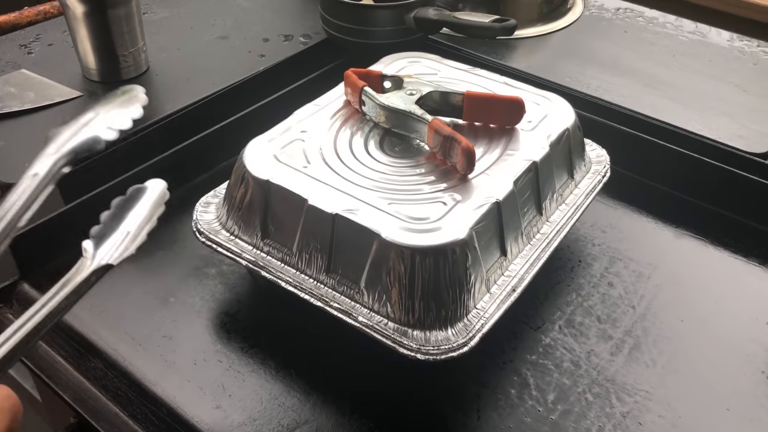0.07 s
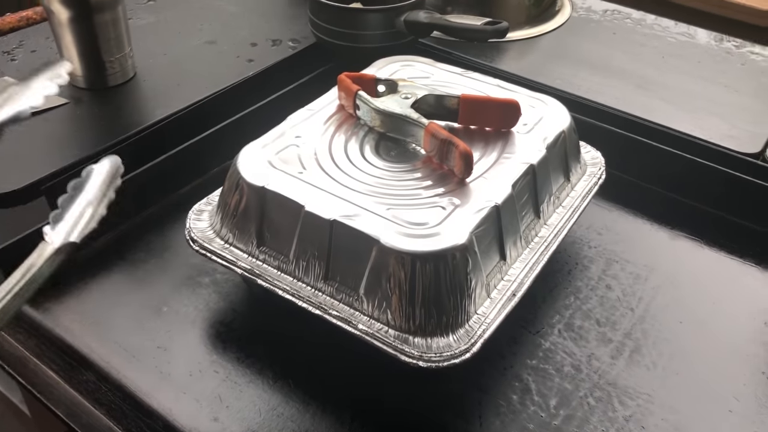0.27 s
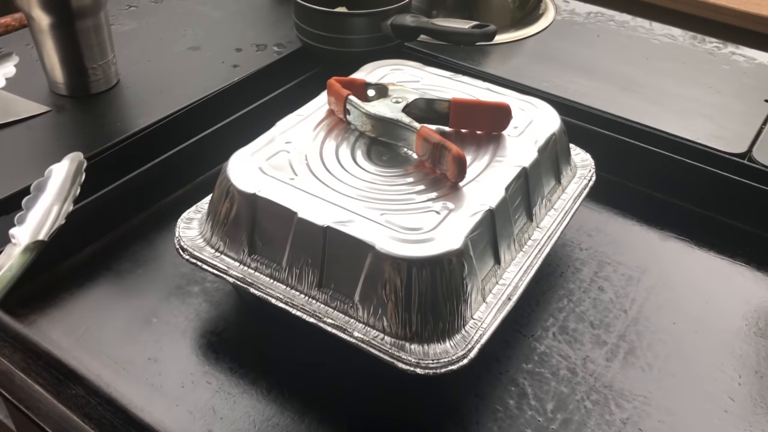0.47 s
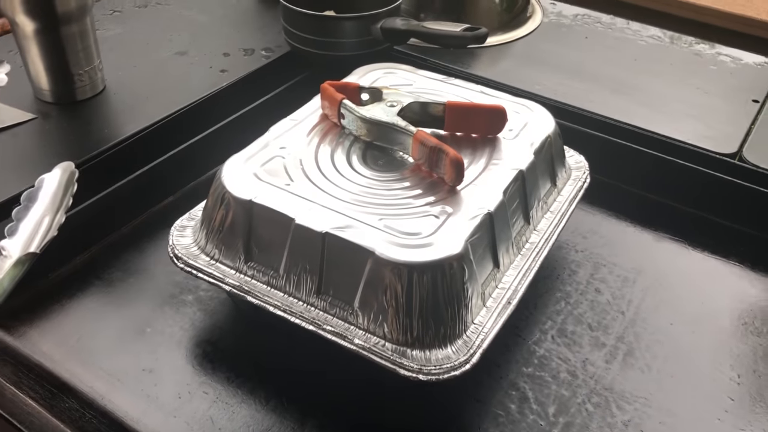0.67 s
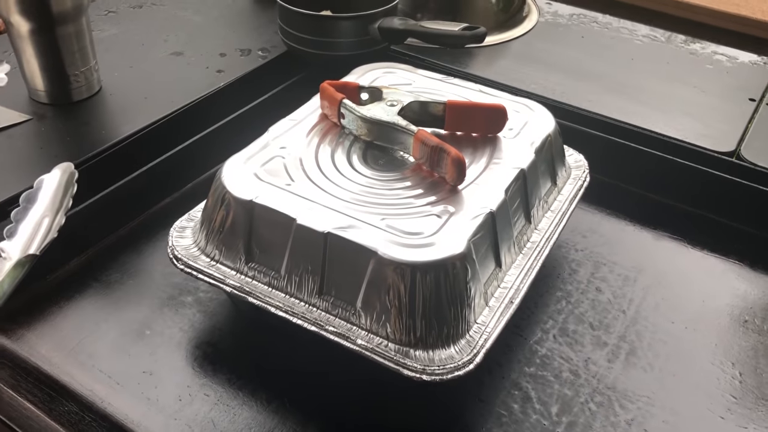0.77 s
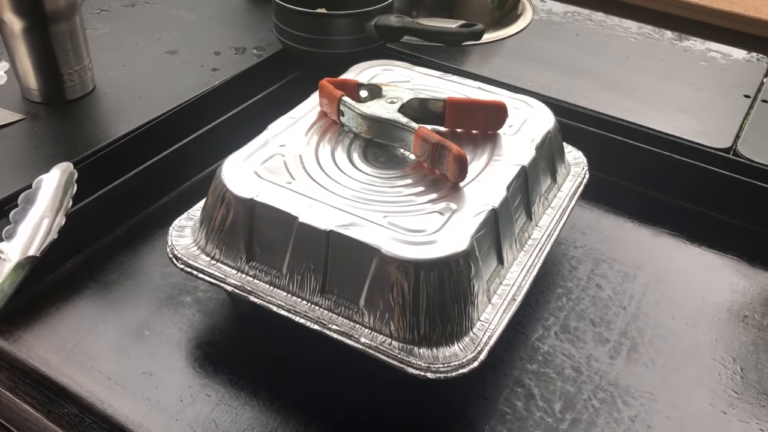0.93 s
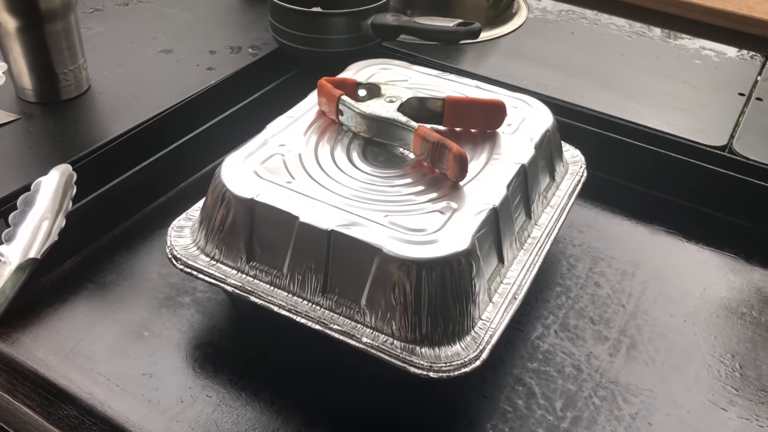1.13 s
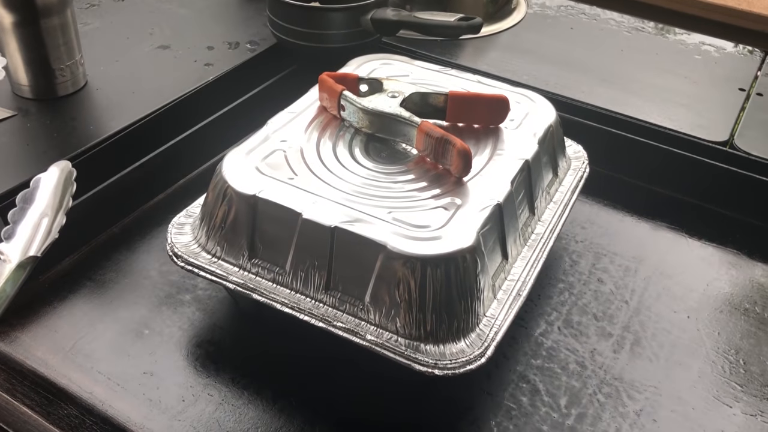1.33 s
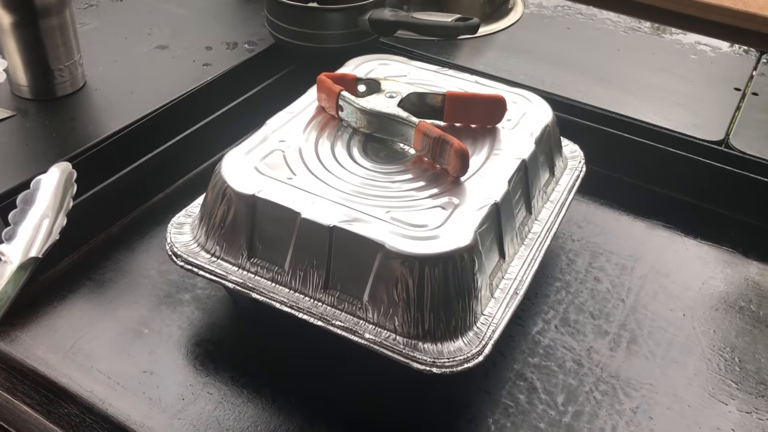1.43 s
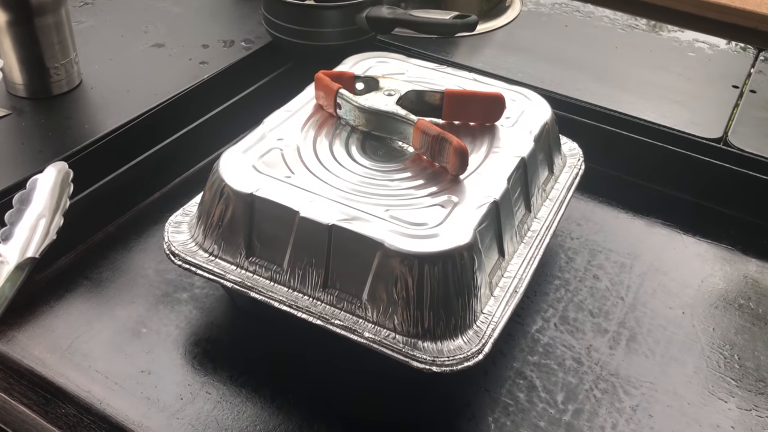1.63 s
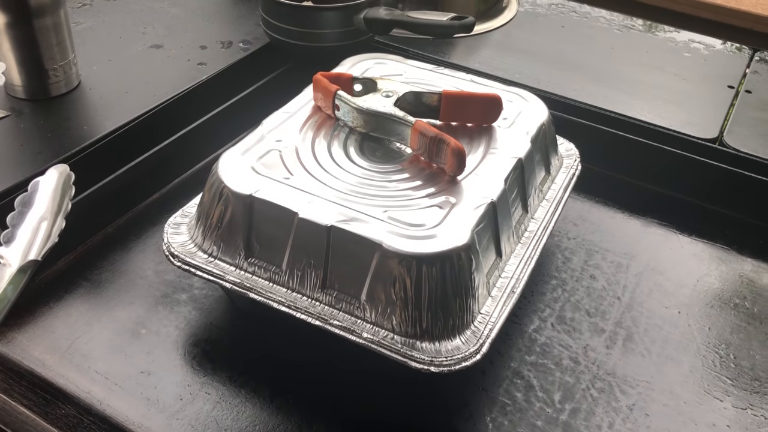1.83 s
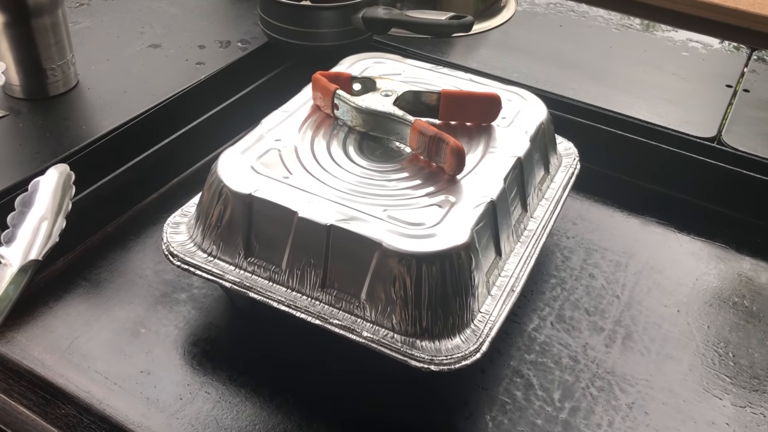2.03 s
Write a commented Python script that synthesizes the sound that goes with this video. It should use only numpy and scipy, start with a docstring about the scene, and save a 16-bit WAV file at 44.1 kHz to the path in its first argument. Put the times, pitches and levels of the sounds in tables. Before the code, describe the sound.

Close up on an outdoor griddle, two quick popcorn pops, the second very loud and rattling the thin foil cover, then a quiet gap and another softer pop with faint ticks, over low hum and sizzle.

```python
"""Popcorn kernels burst in oil on an outdoor griddle, under an upturned foil tray, close to the microphone.
Each of three bursts is a puff (a pressure swing) and a sharp crack (a crowd of fine modes, with rings). Two
kernels fly against the foil, and the tray once drops back onto the griddle; the foil rings like a slack drum
(struck modes and a rattle); pieces tick down. Behind them the oil sizzles faintly (coloured noise and tiny
spits) over the burner's rumble and hum (noise)."""
import sys
import numpy as np
from scipy import signal
from scipy.fft import rfft, irfft
from scipy.io import wavfile

SR = 44100
rng = np.random.default_rng(int(sys.argv[2]) if len(sys.argv) > 2 else 0)


def to_wav(s):
    """Save 16-bit WAV."""
    ch = np.atleast_2d(s).T  # columns
    pcm = np.round(np.clip(ch, -1, 1) * 32767)  # PCM
    wavfile.write(sys.argv[1], SR, pcm.astype(np.int16))


N = 92610
TIME = np.arange(N) / SR   # s
HZ = np.maximum(np.arange(N // 2 + 1) * SR / N, 1)   # the spectrum's bins, kept above zero for logarithms

# Kernels bursting under the tray. Each row: start in seconds, crack level in dB, treble tilt in dB per octave,
# top octaves in dB, hollow ring in dB, hull pitch in Hz, hull ring in dB, puff depth in dB,
# puff width (standard deviation) in seconds, puff lag in seconds.
BURSTS = [(0.2162, -20.5, 1.5, -4, -17, 2538, -21, -14.5, 0.00037, 0.0009),
          (0.3246, -8.5, 0.5, -0.5, -4, 4330, -12.5, -5.5, 0.00054, 0.0036),
          (1.4373, -20, -1.64, -7, -22, 3885, -28, -9.5, 0.00035, -.0002)]
# Colour of the crack. Each row: frequency in Hz, density in dB per Hz.
CRACK_COLOUR = [(100, -10), (420, 2), (750, -6), (1250, -9.5), (1700, 0.5), (2150, -11.5), (2700, -7),
                (4000, 0), (5000, -6.5), (8000, -2), (11000, -7), (15500, -21.5)]
# Resonances of the space under the tray. Each row: frequency in Hz, level in dB, t60 in seconds.
HOLLOW_MODES = [(288, -23, .06), (437, -13.5, 0.071), (541, -22.5, 0.11), (911, -11.5, 0.035),
                (1050, -16.5, 0.041), (1608, -14.5, 0.035), (1738, -19, 0.073), (1968, -30, 0.12),
                (2616, -5, 0.027), (2864, -19.5, .06), (3566, -27, 0.17), (4340, -24.5, .07),
                (6140, -15, 0.039), (6900, -12.5, 0.033), (7920, -34, 0.049)]
# How the crack dies away. Each row: frequency in Hz, t60 in seconds.
CRACK_DECAY = [(150, 0.022), (500, 0.23), (2000, 0.13), (5000, 0.061), (9000, 0.1), (15000, 0.081)]
SNAP_DB, SNAP_T60_S, CRACK_ATTACK_S = 0, 0.019, 0.00083   # the first instant stands above the tail
TOP_HZ = 5100   # where the top octaves begin
HULL_T60_S = 0.035   # each hull rings briefly at its own pitch


def pops():
    """A hull splits: a puff of steam, and a crack that rings and bounces about under the tray."""
    out = 0
    for start, crack_db, tilt_db, top_db, hollow_db, hull_hz, hull_db, puff_db, width, lag in BURSTS:
        top_shelf_db = top_db / (1 + (TOP_HZ / HZ) ** 10)
        fine = crowd(tilted(at_hz(CRACK_COLOUR), tilt_db) + top_shelf_db)
        snap = from_db(SNAP_DB) * fine * fade(start, SNAP_T60_S, CRACK_ATTACK_S)
        tail = dying(fine, start, CRACK_DECAY, CRACK_ATTACK_S) / 2
        hollow = from_db(hollow_db) * modes(start, HOLLOW_MODES)
        hull = from_db(hull_db) * ring(start, hull_hz, HULL_T60_S, 0)
        puff = from_db(puff_db) * swing(start + lag, width)
        out = out + from_db(crack_db) * (snap + tail) + hollow + hull + puff
    return out


# Blows on the foil: two kernels striking it, and between them the tray dropping back onto the griddle. Each
# row: start in seconds, ring level in dB, spot struck (0 or 1), # rattle level in dB, rattle tilt in dB per
# octave.
FOIL_STRIKES = [(.3487, -16, 0, -18.5, 1.5), (0.3703, -26.5, 0, -22, -1.5), (1.5385, -28.5, 1, -28, -0.2)]
# Main modes of the tray. Each row: frequency in Hz, t60 in seconds, level in dB struck at spot 0,
# level in dB struck at spot 1.
TRAY_MODES = [(236, .38, -12, -10), (331, .28, -4, -12), (378, .44, -5, -16), (404, .36, -20, -1),
              (420, .25, -6, -14), (452, .31, 1, -3), (503, .33, -11, -4), (531, .22, -4, -16),
              (579, .34, -15, -5), (618, .26, -3, -15), (662, .32, -12, -13), (741, .33, -12, -11),
              (817, .23, -6, -9), (856, .27, -8, -10), (912, .22, -7, -8), (1094, .24, -20, -4),
              (1145, .28, -15, -6), (1208, .28, -12, -9), (1284, .26, -13, -16), (1378, .2, -17, -2)]
# Colour of the finer foil modes. Each row: frequency in Hz, density in dB per Hz.
RATTLE_COLOUR = [(90, -24), (200, -12), (350, -3), (800, -4), (1050, -6.5), (1350, -7.5), (1850, -8),
                 (2150, -19), (3300, -18.5), (5000, -33), (15000, -47)]
# How the rattle dies away. Each row: frequency in Hz, t60 in seconds.
RATTLE_DECAY = [(200, 0.26), (600, 0.32), (1400, .26), (2500, 0.11), (8000, 0.13)]
DENT_DB, DENT_S = -2, 0.00015   # the foil's first dent, against the rattle level; its width


def foil():
    """A flying kernel, or the tray dropping back onto the griddle, dents the foil and sets its main modes
    ringing, with a rattle of finer ones."""
    out = 0
    for start, ring_db, spot, rattle_db, tilt_db in FOIL_STRIKES:
        struck = [(hz, second_db if spot > .5 else first_db, t60) for hz, t60, first_db, second_db in TRAY_MODES]
        main = modes(start, struck)
        fine = crowd(tilted(at_hz(RATTLE_COLOUR), tilt_db))
        rattle = dying(fine, start, RATTLE_DECAY, STRIKE_ATTACK_S)
        dent = from_db(DENT_DB) * swing(start + DENT_S, DENT_S)
        out = out + from_db(ring_db) * main + from_db(rattle_db) * (rattle + dent)
    return out


# Pieces falling back onto the foil. Each row: start in seconds, level in dB, treble tilt in dB per octave.
FALLING_PIECES = [(0.454, -30, 2), (0.4639, -31.5, 1.5), (0.475, -46, 7.5), (0.5162, -36, 3),
                  (0.62, -54, 6), (1.474, -48.5, 14), (1.509, -51, 10), (1.5415, -43.5, 17),
                  (1.623, -54.5, 10), (1.707, -48.5, 1)]
# Colour of a light touch. Each row: frequency in Hz, density in dB per Hz.
TICK_COLOUR = [(300, 3), (1000, -2.5), (1400, 1), (1800, -3), (2200, -11), (3500, -13), (6000, -25),
               (10000, -27), (15500, -56)]
# How a touch dies away. Each row: frequency in Hz, t60 in seconds.
TICK_DECAY = [(500, .12), (1700, 0.11), (3500, 0.075), (10000, 0.044)]
# Small modes that a light touch rings. Each row: frequency in Hz, level in dB, t60 in seconds.
TICK_MODES = [(1383, -2.5, 0.15), (1663, -0.5, 0.1), (1888, -5.5, 0.17)]


def ticks():
    """Light pieces touch the foil as they fall, ringing fine modes and a few small distinct ones."""
    out = 0
    for start, db, tilt_db in FALLING_PIECES:
        fine = crowd(tilted(at_hz(TICK_COLOUR), tilt_db))
        touch = dying(fine, start, TICK_DECAY, STRIKE_ATTACK_S)
        out = out + from_db(db) * (touch + modes(start, TICK_MODES))
    return out


# Colour of the oil on the griddle. Each row: frequency in Hz, density in dB per Hz.
SIZZLE_COLOUR = [(600, -1.5), (1200, -2.5), (1600, 1), (2250, -5.5), (3500, 1), (5200, -4.5), (6100, -7.5),
                 (8700, -4.5), (12000, -9.5), (15700, -18)]
SIZZLE_DB = -57.5
SPITS_PER_S, SPIT_DB = 290, -70   # tiny bubbles bursting in the oil: mean rate, rms level


def oil():
    """A smooth sizzle, with tiny bubbles bursting at random as clicks of the same colour."""
    colour_db = at_hz(SIZZLE_COLOUR)
    clicks = (rng.random(N) < SPITS_PER_S / SR) * rng.standard_normal(N)
    spits = rms_one(irfft(rfft(clicks) * from_db(colour_db), N))
    return from_db(SIZZLE_DB) * noise(colour_db) + from_db(SPIT_DB) * spits


# Colour of the burner's rumble. Each row: frequency in Hz, density in dB per Hz.
RUMBLE_COLOUR = [(12, -1), (22, 0), (50, -13.5), (90, -9.5), (112, -31.5), (165, -20), (205, -22),
                 (240, -31.5), (450, -31), (1100, -40.5), (2500, -86)]
# Slow course of the rumble. Each row: time in seconds, level in dB.
RUMBLE_LEVEL = [(0, -41.5), (.55, -38.5), (.9, -40), (1.4, -40), (1.65, -41), (2.1, -42)]
# Hum tones of the burner. Each row: frequency in Hz, level in dB.
HUM_TONES = [(87, -60.5), (204.6, -66), (333.8, -68.5)]
HUM_WIDTH_HZ = 5.2   # distance from the centre at which a tone's spectrum is 6 dB down


def burner():
    """Low rumble with a few hum tones, which waver because each is a narrow band of noise."""
    hum = 0
    for hz, db in HUM_TONES:
        peak_db = -20 * np.log10(1 + ((HZ - hz) / HUM_WIDTH_HZ) ** 2)
        hum = hum + from_db(db) * noise(peak_db)
    level_db = np.interp(TIME, *np.transpose(RUMBLE_LEVEL))
    return from_db(level_db) * noise(at_hz(RUMBLE_COLOUR)) + hum


REBOUND = 1.88   # a pressure dip swings back this many times more slowly


def swing(start, width):
    """A brief dip of pressure and its slower, shallower rebound."""
    u = (TIME - start) / width
    dip = np.exp(-u ** 2 / 2)
    rebound = np.exp(-(u / REBOUND - 1) ** 2 / 2) / REBOUND
    return rebound - dip


STRIKE_ATTACK_S = 0.00062   # time constant of the rise
PHASE_SCATTER = 0.63   # radians (standard deviation) by which the modes fall out of step at a blow


def ring(start, hz, t60, phase):
    """One struck mode: a sine that rises quickly and decays."""
    return np.sin(2 * np.pi * hz * (TIME - start) + phase) * fade(start, t60, STRIKE_ATTACK_S)


def modes(start, table):
    """Strike a set of modes (Hz, dB, t60 in seconds), roughly in step."""
    return sum(from_db(db) * ring(start, hz, t60, rng.normal() * PHASE_SCATTER) for hz, db, t60 in table)


MODE_GAP_HZ, MODE_GAP_SHARE = 20, .006   # spacing of the fine modes, and its growth with frequency


def crowd(colour_db):
    """Many fine modes, unevenly spaced and at random phases, as a steady sound of rms 1."""
    rank = np.cumsum(SR / N / (MODE_GAP_HZ + MODE_GAP_SHARE * HZ))   # number of modes below each bin
    uneven, phase = rng.random((2, 1500))
    bins = np.searchsorted(rank, np.arange(len(uneven)) + uneven / 2)
    kept = bins < len(HZ)
    bins = bins[kept]
    spectrum = np.zeros(len(HZ), complex)
    # sparser modes are each stronger, so that the level per Hz follows the colour
    strength = from_db(colour_db[bins]) / np.sqrt(np.gradient(rank)[bins])
    spectrum[bins] = strength * np.exp(2j * np.pi * phase[kept])
    return rms_one(irfft(spectrum, N))


def fade(start, t60, attack):
    """Quick rise, then exponential decay by 60 dB in t60 seconds."""
    age = np.maximum(TIME - start, 0)
    decay = np.exp(-np.minimum(np.log(1000) * age / t60, 40))
    return (1 - np.exp(-age / attack)) * decay


def dying(sound, start, decay, attack):
    """Each octave of a steady sound dies at its own rate."""
    spectrum, out = rfft(sound), 0
    octave = np.clip(np.log2(HZ / 125), 0, 7)
    for k in range(8):
        overlap = np.maximum(1 - abs(octave - k), 0)   # triangular bands that sum to one
        band = irfft(spectrum * overlap, N)
        out = out + band * fade(start, at_hz(decay, 125 * 2 ** k), attack)
    return out


def noise(colour_db):
    """Steady noise of the given colour, rms 1."""
    return rms_one(irfft(rfft(rng.standard_normal(N)) * from_db(colour_db), N))


def tilted(colour_db, tilt_db):
    """Tip a colour by so many dB per octave above 500 Hz."""
    return colour_db + tilt_db * np.log2(np.maximum(HZ, 500))


def at_hz(points, hz=HZ):
    """Read a table on a log-frequency axis."""
    f, value = np.transpose(points)
    return np.interp(np.log(hz), np.log(f), value)


def from_db(db):
    """Decibels to gain."""
    return 10 ** (np.asarray(db) / 20)


def rms_one(x):
    """Scale to unit rms."""
    return x / np.sqrt(np.mean(x ** 2) + 1e-20)


def scene():
    """Everything at one close microphone."""
    return (pops() + foil() + ticks() + oil() + burner())[None]


CUTOFF_HZ = 15900


def record(dry):
    """Peaks beyond full scale overload and clip; a steep low-pass then cuts the top."""
    low_pass = signal.ellip(12, .2, 95, CUTOFF_HZ, fs=SR, output="sos")   # ripple and stopband in dB
    return signal.sosfilt(low_pass, np.clip(dry, -1, 1))


dry = scene()
out = record(dry)
to_wav(out)
```